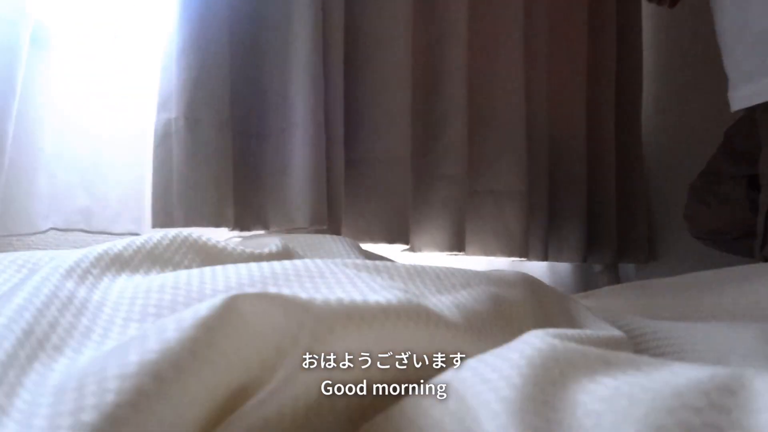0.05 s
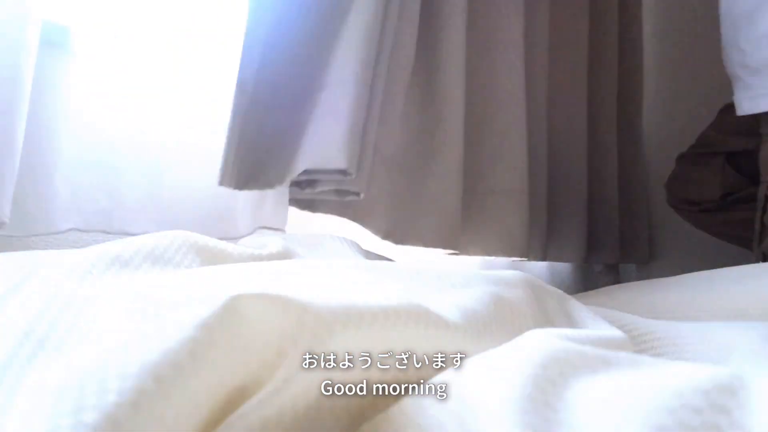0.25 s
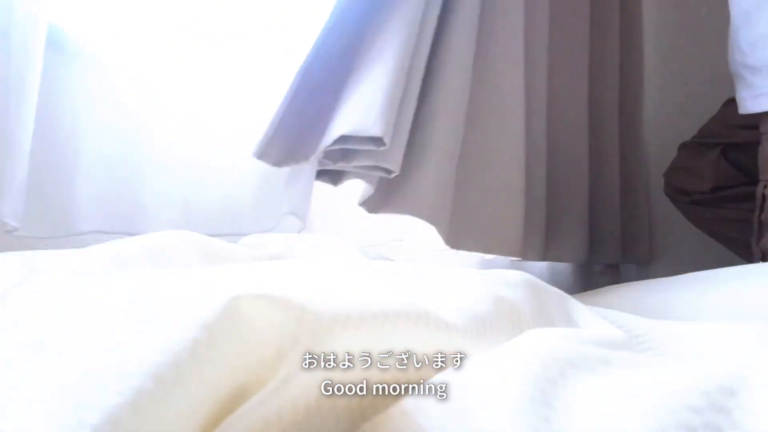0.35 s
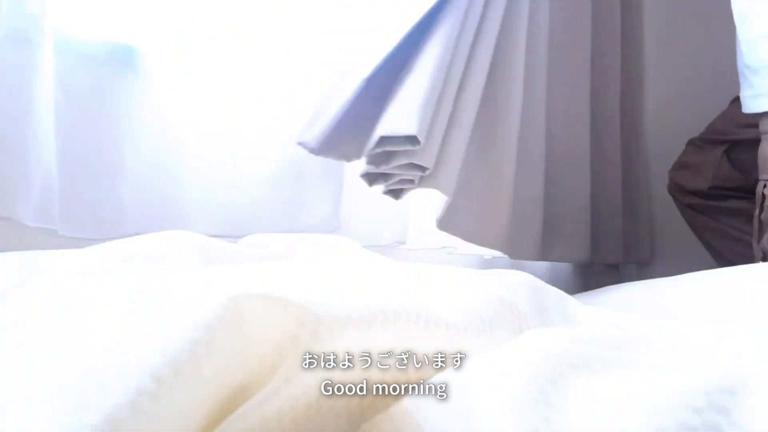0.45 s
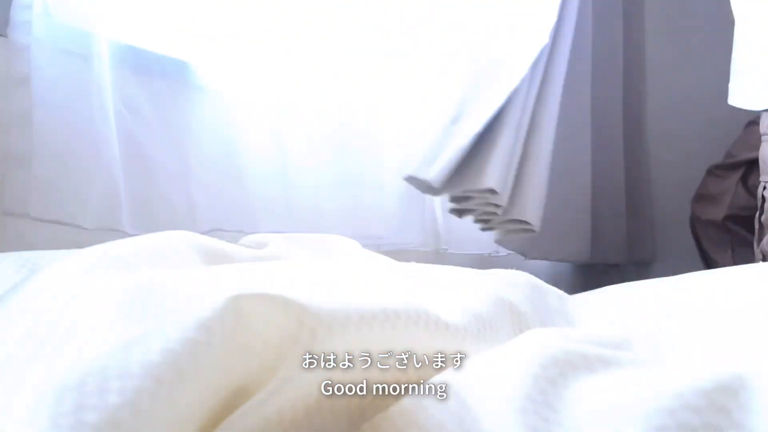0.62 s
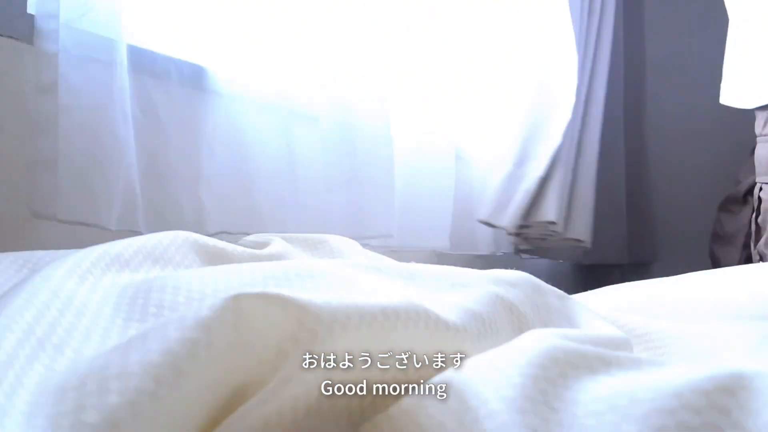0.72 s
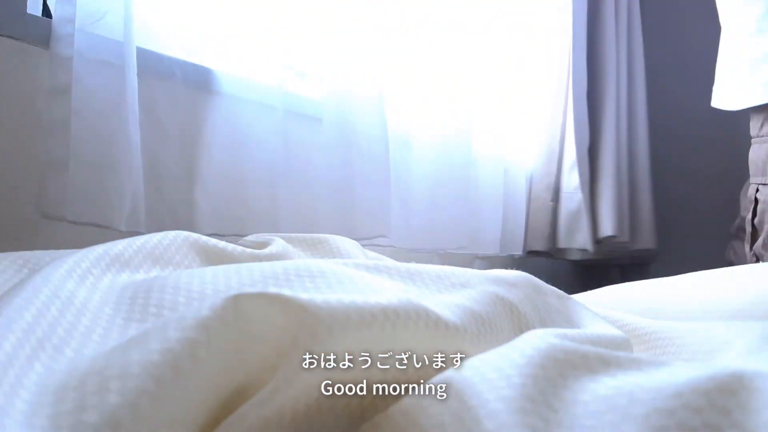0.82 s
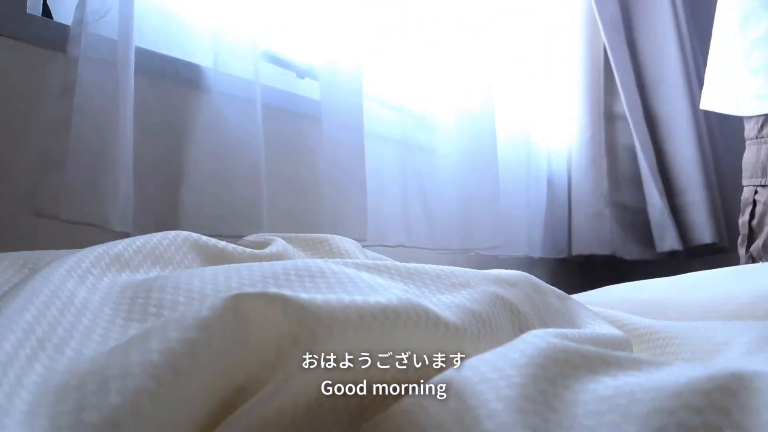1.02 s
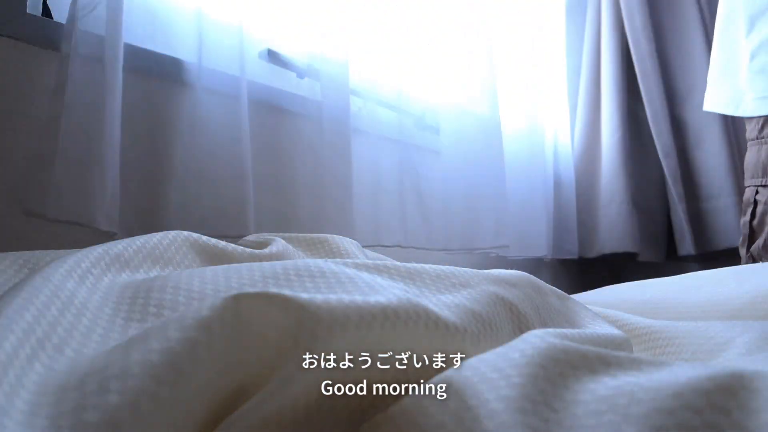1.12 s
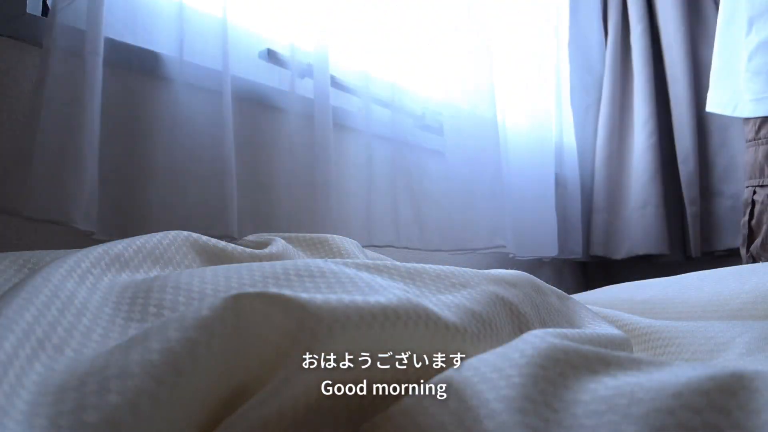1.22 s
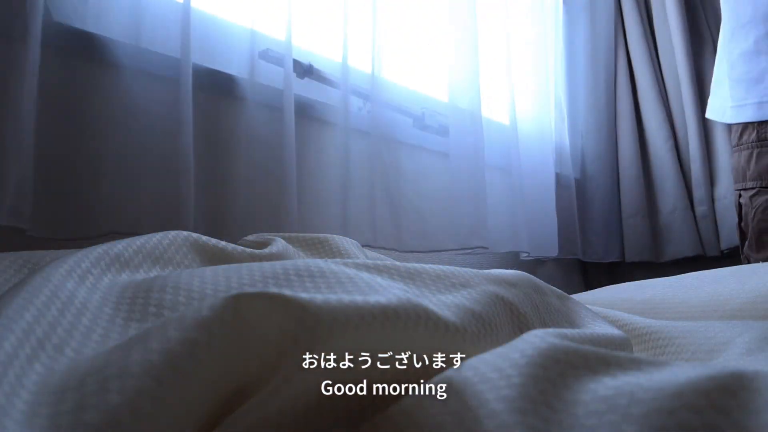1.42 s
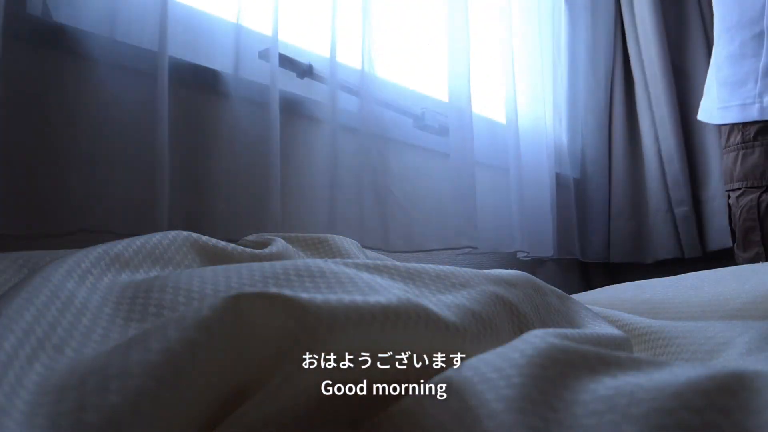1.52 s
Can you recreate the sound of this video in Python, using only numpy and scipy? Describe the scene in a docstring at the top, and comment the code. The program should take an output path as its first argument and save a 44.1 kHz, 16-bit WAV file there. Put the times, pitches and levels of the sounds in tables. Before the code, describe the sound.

Curtain runners slide along a rail twice, rattling and clacking, ending in soft cloth thumps.

```python
"""Plastic runners slide along a rail as heavy curtains are drawn open in two pulls in a small bedroom.
After a faint rustle of grabbed cloth, stick-slip friction makes a rasp and drives the rail's low
modes into a drone. The runners chatter in the track, and single ones collide with a snap and a ring.
The bunching curtain ends in soft, damped thumps. The room adds short reverberation and a low hum of noise."""
import sys
import numpy as np
from scipy import signal
from scipy.fft import rfft, irfft, next_fast_len
from scipy.io import wavfile

SR = 44100
rng = np.random.default_rng(int(sys.argv[2]) if len(sys.argv) > 2 else 0)


def unload_wav(signal):
    """Save mono or channel-first audio to the path in sys.argv[1] as 16-bit WAV at rate SR, clipped to [-1, 1]."""
    wavfile.write(
        sys.argv[1],
        SR,
        np.round(np.clip(np.atleast_2d(signal).T, -1, 1) * 32767).astype(np.int16),
    )


N = 68355
T = np.arange(N) / SR

# spectrum of the room's background: (f/Hz, relative level/dB)
ROOM_SPECTRUM = [(20, -24), (40, 0), (58, 7.5), (85, 4), (125, 9.5), (200, -1), (320, 1), (450, -11),
                 (900, -14.5), (2400, -17.5), (5000, -25.5), (10000, -31), (15000, -41)]
# effort of the two pulls, as the level of sliding: (t/s, level/dB)
PULL_EFFORT = [(0.0, -69.5), (0.148, -57.5), (0.166, -44), (0.195, -42), (0.235, -33.5), (0.33, -28.5),
               (0.5, -26), (0.67, -28.5), (0.745, -34.5), (0.79, -37.5), (0.84, -41.5), (0.91, -31),
               (0.97, -25), (1.12, -24), (1.22, -30), (1.255, -37), (1.3, -51), (1.4, -69.5)]
# spectrum of the sliding friction: (f/Hz, relative level/dB)
FRICTION_SPECTRUM = [(60, -28), (150, -10.5), (400, -1.5), (720, -3.5), (880, -8), (1130, -5.5),
                     (1350, -1.5), (1700, -2), (1950, -6), (2350, 1), (3000, -4.5), (3400, -2), (4250, 0),
                     (5600, 2.5), (6300, -2.5), (7650, -5), (8250, -4.5), (9450, -3.5), (10000, -8),
                     (12300, -13.5), (13500, -19), (15500, -39)]
# modes of a plastic runner: (f/Hz, relative level/dB, T60/s)
RUNNER_MODES = [(3850, -15.5, 0.013), (4560, -15.5, 0.029), (4701, -2, 0.011), (4822, -10.5, 0.021),
                (5220, -19, 0.0072), (5280, -14.5, 0.014), (8400, -13, .014)]
# chatter relative to the pull: (t/s, level/dB)
CHATTER_LEVEL = [(0.0, -14), (0.21, -18), (0.28, -2.5), (0.41, 2.5), (0.5, -1.5), (0.7, -3), (0.88, -3.5),
                 (1.0, 0.5), (1.08, -3.5), (1.22, -6), (1.3, -11)]
# modes of the rail on its brackets: (f/Hz, relative level/dB, T60/s)
RAIL_MODES = [(185.8, -11, 0.29), (275.2, -5, 0.18), (346, -4, 0.058), (473.2, -0.5, 0.074),
              (597.4, 1.5, 0.043), (675.3, -2, 0.14), (771, -8.5, 0.06), (1352, -2, 0.075),
              (1564, 1, 0.026), (1652, -4.5, 0.12)]
# drone of the loaded rail relative to the pull: (t/s, level/dB)
DRONE_LEVEL = [(0.1, -2.5), (0.23, -6), (0.33, -7), (0.55, -8.5), (0.82, -1.5), (0.95, -9), (1.07, -4.5),
               (1.2, -10), (1.29, -1)]
# runners colliding: (t/s, relative ring level/dB, relative snap level/dB, snap centre f/Hz)
COLLISIONS = [(0.160, -30.5, -16.5, 9900), (0.340, -22, -27, 6840), (0.394, -30, -20, 7000),
              (0.4167, -12, -9, 8000), (0.4548, -19, -21, 7000), (0.5152, -10, -31, 7000),
              (0.793, -36, -22, 7000), (0.8011, -17, -11, 9900), (0.8021, -13.5, -8, 6960),
              (0.816, -43, -16, 9000), (0.9386, -6.5, -7, 7400), (0.9957, -12.5, -18, 6900),
              (1.1353, -8, -16, 7900), (1.1418, -13, -6.5, 7750), (1.1700, -23, -5.5, 9900),
              (1.2161, -12, -4.5, 7900), (1.2221, -15, -5, 7400)]
# soft blows of the bunched curtain: (t/s, level/dB, f/Hz)
CLOTH_BLOWS = [(1.166, -22, 182), (1.183, -21.5, 140), (1.2008, -15.5, 478.3), (1.2031, -20.5, 322),
               (1.2047, -23, 185), (1.2062, -16, 516), (1.227, -24.5, 162), (1.254, -33.5, 510),
               (1.490, -38, 329)]
# gain of the left-right difference in diffuse sound: (f/Hz, level/dB)
SIDE_SPECTRUM = [(60, -54), (125, -118), (250, -34), (500, -12.5), (1000, -9.5), (2000, -8), (4000, 0),
                 (12000, 2)]

SLIPS_PER_S, SLIP_SPREAD_DB = 7000, 2


def from_db(db):
    """Amplitude grows tenfold for every 20 dB."""
    return 10 ** (np.asarray(db) / 20)


def unit_rms(x):
    """Normalisation to unit mean power."""
    return x / np.sqrt(np.mean(x ** 2) + 1e-20)


def in_time(rows):
    """Linear interpolation between (t/s, value) points."""
    return np.interp(T, *np.transpose(rows))


def colour(x, points):
    """Minimum-phase filter through (f/Hz, level/dB) points."""
    size = 2 * next_fast_len(N)
    hz, db = np.transpose(points)
    grid_hz = np.maximum(np.arange(size // 2 + 1) * SR / size, 1)
    gain = from_db(np.interp(np.log(grid_hz), np.log(hz), db))
    cepstrum = irfft(np.log(gain))
    cepstrum[1:size // 2] *= 2  # folding makes the filter causal
    cepstrum[size // 2 + 1:] = 0
    return irfft(rfft(x, size) * np.exp(rfft(cepstrum)))[..., :N]


def cut(x, hz, kind, order=2):
    """Butterworth low- or high-pass filter."""
    return signal.sosfilt(signal.butter(order, hz, kind, fs=SR, output="sos"), x)


def resonance(x, hz, width_hz):
    """Two-pole resonator with unit peak gain."""
    r = np.exp(-np.pi * width_hz / SR)
    poles = [1, -2 * r * np.cos(2 * np.pi * hz / SR), r * r]
    return signal.lfilter(np.array([1, 0, -1]) * (1 - r * r) / 2, poles, x)


def ring(clicks, modes):
    """Modal superposition: each contact excites each damped mode with its own strength."""
    total = 0
    for hz, db, t60 in modes:
        r, w = from_db(-60 / (t60 * SR)), 2 * np.pi * hz / SR
        force = clicks * from_db(db + 2 * rng.standard_normal(N))
        total += signal.lfilter([.5, 0, -.5], [1, -2 * r * np.cos(w), r * r], force + 1e-18)
    return total


def contacts(per_s, spread_db):
    """Poisson process: random impulses of uneven size and sign."""
    sizes = from_db(spread_db * np.minimum(rng.exponential(1, N), 3))
    return sizes * rng.choice([-1, 1], N) * (rng.random(N) < per_s / SR)


def decay(start_s, t60):
    """Exponential decay from 1, falling 60 dB in t60 seconds."""
    return (T >= start_s) * from_db(-60 * np.maximum(T - start_s, 0) / t60)


def stereo(mid, side):
    """Sum and difference give left and right, nearly coherent in the bass."""
    return mid + colour(side, SIDE_SPECTRUM) * np.array([[1], [-1]])


def room_noise():
    """Stationary noise, strongest in the bass, forms the background."""
    mid, side = unit_rms(colour(rng.standard_normal((2, N)), ROOM_SPECTRUM))
    return from_db(-49.5) * stereo(mid, side)


def cloth_rustle(peak_s=0.082, half_width_s=0.029):
    """Friction between fibres makes a faint crackle as the hand grabs the cloth."""
    fibres = unit_rms(resonance(contacts(SLIPS_PER_S, SLIP_SPREAD_DB), hz=2800, width_hz=2900))
    return fibres * from_db(-55.5) * np.exp(-((T - peak_s) / half_width_s) ** 2)


def runner_rasp(pull_db, flutter_db=1.0, flutter_hz=32, full_pull_db=-25):
    """Stick-slip friction: tiny slips of the runners merge into a rasp, brighter with speed."""
    friction = unit_rms(colour(contacts(SLIPS_PER_S, SLIP_SPREAD_DB), FRICTION_SPECTRUM))
    flutter = unit_rms(cut(rng.standard_normal(2 * N), flutter_hz, "low")[N:])
    rasp = friction * from_db(pull_db + 1 + flutter_db * flutter)
    treble = cut(rasp, 6350, "high", order=1)
    treble_gain = from_db(0.63 * np.maximum(pull_db - full_pull_db, -20))
    return rasp + treble * (treble_gain - 1)


def runner_chatter(pull_db):
    """Impact excitation: runners jiggle in the track and ring at their natural frequencies."""
    rings = sum(ring(contacts(per_s=900, spread_db=1.8), [mode]) for mode in RUNNER_MODES)
    return unit_rms(rings) * from_db(pull_db + in_time(CHATTER_LEVEL))


def rail_drone(pull_db):
    """Forced vibration: random slips drive the rail's low modes."""
    rings = sum(ring(contacts(SLIPS_PER_S, SLIP_SPREAD_DB), [mode]) for mode in RAIL_MODES)
    return unit_rms(rings) * from_db(pull_db + in_time(DRONE_LEVEL))


def sliding(side_db=-4.2, left_over_right_db=0.5):
    """Incoherent sources: runners spread along the rail make a wide sound."""
    pull_db = in_time(PULL_EFFORT)
    mid, side = (runner_rasp(pull_db) + runner_chatter(pull_db) + rail_drone(pull_db) for _ in range(2))
    balance = from_db([[left_over_right_db / 2], [-left_over_right_db / 2]])
    return stereo(mid, from_db(side_db) * side) * balance


def runner_clacks():
    """Collision: one runner hits the next with a broadband snap and rings in free vibration."""
    clicks, snaps = np.zeros(N), 0
    for start_s, ring_db, snap_db, hz in COLLISIONS:
        clicks[int(start_s * SR)] += from_db(ring_db)
        burst = rng.standard_normal(N) * decay(start_s, t60=0.028)
        snaps += from_db(snap_db) * resonance(burst, hz, width_hz=4600)
    rings = resonance(ring(clicks, RUNNER_MODES), hz=5130, width_hz=1600)  # band that a knock drives
    return from_db(-3.5) * rings + from_db(-11.5) * cut(snaps, 12900, "low", order=4)


def curtain_thumps(attack_s=0.0033):
    """Damped oscillation: dull knocks as the curtain piles up at the end of the rail."""
    knocks = 0
    for start_s, db, hz in CLOTH_BLOWS:
        envelope = decay(start_s, t60=0.062) - decay(start_s, attack_s)
        knocks += from_db(db) * envelope * np.sin(2 * np.pi * hz * (T - start_s))
    return cut(knocks, 94, "high")


def reflections(x, db, t60):
    """Diffuse reflection: convolution with exponentially decaying noise, thinned in the bass."""
    response = from_db(db) * unit_rms(rng.standard_normal((2, N)) * decay(0.00024, t60)) / np.sqrt(N)
    response = cut(response, 617, "high", order=1)
    mid, side = signal.fftconvolve(response, x[None], axes=1)[:, :N]
    return stereo(mid, side)


def scene():
    """Superposition of the direct sound, early reflections, reverberation and background."""
    slide = sliding()
    clacks = runner_clacks()
    early = reflections(clacks, db=0.5, t60=0.045)  # off window and ceiling
    curtain = cloth_rustle() + slide + clacks + early + curtain_thumps()
    return room_noise() + curtain + reflections(curtain.mean(axis=0), db=-10, t60=0.28)


def record(dry):
    """Band limiting: a steep elliptic low-pass removes the highest treble."""
    return signal.sosfilt(signal.ellip(12, .1, 90, 15550, fs=SR, output="sos"), dry)


dry = scene()
out = record(dry)
unload_wav(out)
```